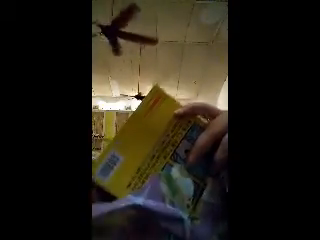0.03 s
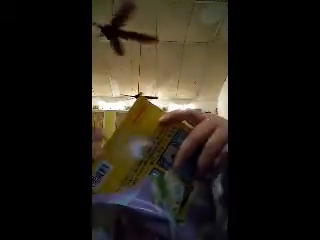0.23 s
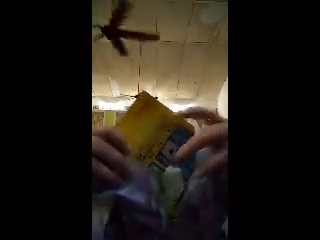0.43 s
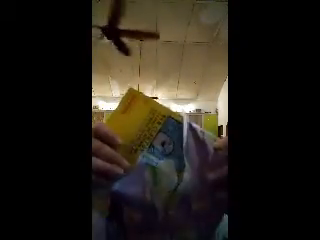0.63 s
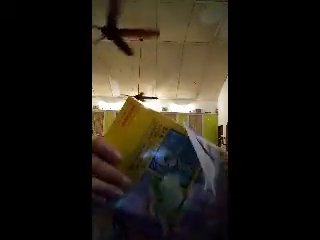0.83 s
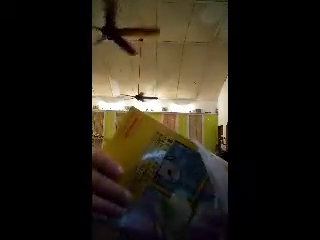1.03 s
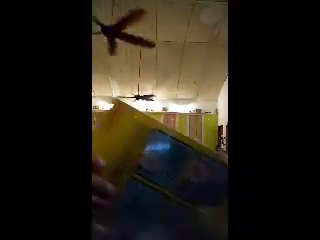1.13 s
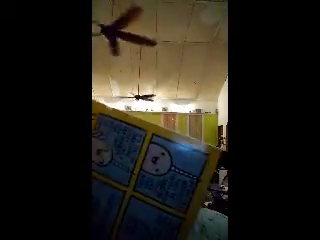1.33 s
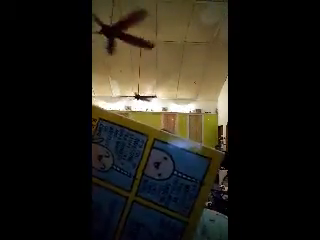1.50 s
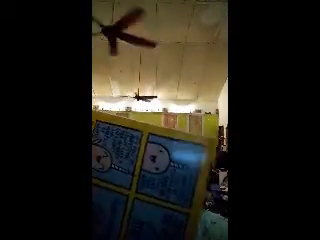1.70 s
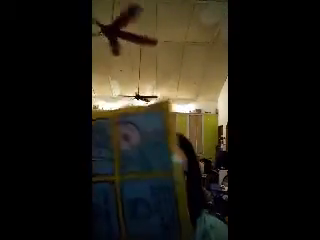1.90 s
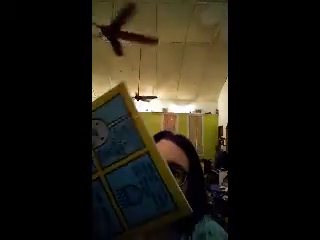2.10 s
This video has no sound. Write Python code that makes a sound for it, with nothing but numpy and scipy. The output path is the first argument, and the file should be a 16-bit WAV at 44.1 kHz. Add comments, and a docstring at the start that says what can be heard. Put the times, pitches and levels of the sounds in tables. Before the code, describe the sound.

Wrapping paper crackles in sharp, uneven bursts close to the microphone, then slides off a flat box with a brief rising swish, followed by more dense crinkling in a quiet room with a short tail.

```python
"""Creases snap singly, each with its own pitch, as wrapping paper is pulled off a flat boxed gift in a room.
Each snap is a click and a few milliseconds of crackle; a dense rustle of tiny ringing buckles lies under them.
The sheet slides off once as a mostly rising rush of filtered noise; the hollow box hums and rumbles in narrow bands.
Snaps and slide get a short noise tail, and faint room tone runs throughout. The paper's bass is cut;
the microphone adds a low thump that follows the paper's bursts, narrow dips and a falling top."""
import sys
import numpy as np
from scipy import signal
from scipy.fft import rfft, irfft
from scipy.io import wavfile

SR = 44100
rng = np.random.default_rng(int(sys.argv[2]) if len(sys.argv) > 2 else 0)


def wav_record(signal):
    """Record a signal, one row per channel, as 16-bit PCM in the file named by sys.argv[1]."""
    frames = np.transpose(np.atleast_2d(signal))
    bounded = np.clip(frames, -1, 1)
    # unit amplitude maps onto the largest positive 16-bit level
    quanta = np.round(bounded * 32767).astype(np.int16)
    wavfile.write(sys.argv[1], SR, quanta)


N = 94903


def from_db(db):
    """Decibels to gain."""
    return 10 ** (np.asarray(db) / 20)


def rms_one(x):
    """Scale to unit rms."""
    return x / np.sqrt(np.mean(x ** 2) + 1e-20)


def at_hz(points, hz):
    """Read a (Hz, dB) spectrum table on a log-frequency axis."""
    points_hz, points_db = np.transpose(points)
    return np.interp(np.log(hz), np.log(points_hz), points_db)


def butter(x, order, edge_hz, kind="low"):
    """Causal Butterworth filter."""
    return signal.sosfilt(signal.butter(order, edge_hz, kind, fs=SR, output="sos"), x)


def band(x, low_hz, high_hz):
    """Causal band-pass, upper edge held below Nyquist."""
    return butter(x, 2, [low_hz, min(high_hz, .45 * SR)], "band")


def band_q(x, hz, q):
    """Band-pass around a pitch; higher q is narrower."""
    ratio = 1 + .5 / q
    return band(x, hz / ratio, hz * ratio)


def ring(clicks, hz, t60_s):
    """Two-pole resonator: each click sets off a decaying sine."""
    radius = from_db(-60 / (t60_s * SR))
    w = 2 * np.pi * hz / SR
    # the tiny offset avoids denormals
    return signal.lfilter([0, np.sin(w)], [1, -2 * radius * np.cos(w), radius ** 2], clicks + 1e-18)


def drift(rate_hz):
    """Slow random wander of unit rms: noise through a double low-pass pole."""
    pole = np.exp(-2 * np.pi * rate_hz / SR)
    wander = signal.lfilter([1], [1, -2 * pole, pole ** 2], rng.standard_normal(N + SR))
    return rms_one(wander[SR:])  # first second settles the filter


def moving_band(rows, width_hz):
    """Noise in a resonance whose level and centre follow (s, dB, Hz) rows; also returns the gain."""
    s, db, hz = np.transpose(rows)
    t = np.arange(N) / SR
    swing = butter(rng.standard_normal((2, N)), 2, width_hz / 2)
    phase = 2 * np.pi * np.cumsum(np.interp(t, s, hz)) / SR
    gain = from_db(np.interp(t, s, db, -120, -120))
    carried = swing[0] * np.cos(phase) + swing[1] * np.sin(phase)
    return gain * rms_one(carried), gain


def rustle():
    """Tiny buckles come in clumps, each ringing a few cycles at one of 26 pitches over a wide range."""
    # Each row: start in seconds, level 1.5-6 kHz in dB, level below 1.5 kHz in dB, level above 6 kHz in dB.
    level_rows = [(0.0, -39.5, -42.5, -54), (0.032, -40.5, -43, -65.0), (0.067, -56, -52, -79),
                  (0.085, -60.0, -62, -84.0), (0.097, -57, -50.5, -87), (0.117, -62, -57, -92),
                  (0.247, -57, -68.0, -96), (0.267, -45.5, -52, -85), (0.279, -51, -65, -83),
                  (0.297, -34.0, -35.5, -56), (0.317, -52, -51, -72), (0.342, -41, -45.5, -64.0),
                  (0.354, -32.5, -41.5, -51.5), (0.402, -45, -52, -52), (0.419, -38, -53, -52.5),
                  (0.451, -40.5, -41, -48.5), (0.519, -38.5, -47, -52), (0.536, -41.5, -60, -54),
                  (0.554, -34.5, -41.5, -44), (0.596, -50.5, -56.0, -66), (0.624, -46.5, -51.0, -71),
                  (0.646, -39, -46.5, -59), (0.661, -50.5, -59, -72), (0.681, -46.5, -50.0, -57),
                  (0.723, -44, -46.5, -62), (0.746, -35, -41, -49.5), (0.763, -38.5, -43.5, -54),
                  (0.806, -35.0, -37.0, -48), (0.856, -47.0, -46, -62), (0.88, -48.5, -49, -62.0),
                  (0.913, -52.5, -55.5, -81), (1.035, -39.5, -41, -44), (1.165, -37.5, -42.5, -46),
                  (1.185, -41.0, -41, -62.0), (1.245, -50, -54, -69), (1.26, -47.5, -52, -66),
                  (1.277, -53, -60, -78), (1.342, -59, -60.0, -92), (1.357, -50, -54, -84.0),
                  (1.369, -43, -63, -53), (1.394, -61, -55.5, -88), (1.412, -43, -52.5, -68),
                  (1.459, -63.5, -61, -83), (1.479, -44, -46.5, -62.0), (1.512, -54.5, -51.5, -74),
                  (1.527, -39, -48.5, -50), (1.556, -52.5, -62, -71), (1.574, -36.5, -45, -46),
                  (1.594, -40.5, -52, -64), (1.619, -40.5, -45, -47), (1.679, -44.5, -58, -56.5),
                  (1.721, -27, -37, -39.5), (1.768, -44.0, -49.5, -59.5), (1.813, -33.5, -39.5, -40.5),
                  (1.848, -31, -41, -52), (1.863, -40, -42, -53.5), (1.903, -37.5, -41.5, -50),
                  (1.931, -41, -51, -58), (2.025, -46.5, -51, -65), (2.07, -38, -42.5, -55),
                  (2.085, -35.5, -39.0, -42.5), (2.15, -39, -41, -58)]
    # Relative colour within each group. Each row: frequency in Hz, density in dB per Hz.
    colour = [(88, -71), (150, -87.5), (466, -1.5), (689, -1.5), (1310, -1), (1500, 9), (1690, -7.5),
              (3840, -2.5), (9630, -53), (12200, -43), (16000, -53)]
    grains_per_s, grain_spread_db, grain_cycles = 13000, 3.2, 2.8
    clump_db, clump_rate_hz = 1.3, 58

    s, *levels = np.transpose(level_rows)
    t = np.arange(N) / SR
    middle_db, body_db, treble_db = [np.interp(t, s, level) for level in levels]

    clump = from_db(clump_db * drift(clump_rate_hz))
    spread = from_db(grain_spread_db * np.minimum(rng.exponential(1, N), 5))
    sizes = clump * spread * rng.choice([-1, 1], N)
    born = rng.random(N) < grains_per_s / SR
    pitches_hz = np.geomspace(450, 15000, 26)
    dealt = rng.integers(0, len(pitches_hz), N)

    groups = np.zeros((3, N))  # body, middle, treble
    for k, hz in enumerate(pitches_hz):
        clicks = sizes * born * (dealt == k)
        grains = band(ring(clicks, hz, grain_cycles / hz), hz / 1.21, hz * 1.346)
        gain = from_db(at_hz(colour, hz)) * np.sqrt(hz)  # bandwidth grows with pitch
        groups[np.searchsorted([1500, 6000], hz)] += gain * rms_one(grains)
    groups[1] = butter(groups[1], 6, 5800)
    return sum(from_db(db) * rms_one(g) for db, g in zip((body_db, middle_db, treble_db), groups))


def mic_thump(paper):
    """Microphone thump: the paper sound rectified and band-passed low, following its bursts."""
    return from_db(-45) * band(np.abs(paper), 28, 180)


def box_hum():
    """The hollow box hums: narrow-band noise with a wandering centre, fluttering in level."""
    # Each row: start in seconds, level before flutter in dB, resonance in Hz.
    hum_rows = [(0.0, -56, 529), (0.02, -51, 517), (0.24, -64, 490), (0.29, -51, 520), (0.37, -57.5, 481),
                (0.39, -61, 512), (0.42, -44, 543), (0.5, -50, 493), (0.52, -48.5, 492), (0.6, -66, 517),
                (0.63, -66, 489), (0.71, -70, 548), (0.73, -54, 558), (0.84, -52.5, 494), (0.91, -74, 530),
                (1.09, -32.5, 526), (1.12, -59, 530), (1.27, -48.5, 466), (1.32, -52.5, 434),
                (1.38, -63, 478), (1.52, -50.5, 508), (1.54, -63, 494), (1.62, -42.5, 555),
                (1.65, -56, 527.6), (1.71, -35, 512.6), (1.76, -59, 525.7), (1.89, -44.5, 511),
                (1.96, -52, 483), (2.06, -43.5, 562), (2.15, -73, 523)]
    hum, _ = moving_band(hum_rows, width_hz=100)
    flutter_db = 6.5 * (drift(24) - 1.5)
    return hum * from_db(flutter_db)


def handling_rumble():
    """Hands on the box: dull noise, band-passed twice, with a moving level."""
    # Each row: start in seconds, level in dB.
    rumble_rows = [(0.0, -64.5), (0.04, -66), (0.2, -106), (0.36, -63.5), (0.68, -109), (0.73, -85),
                   (0.84, -74.5), (1.0, -89), (1.09, -76.5), (1.16, -61.5), (1.3, -91), (1.5, -62),
                   (1.56, -86), (1.61, -63), (1.67, -78), (1.7, -70), (1.77, -74), (1.83, -60.5),
                   (2.02, -89), (2.15, -69)]
    s, db = np.transpose(rumble_rows)
    low = band(band(rng.standard_normal(N), 192, 510), 192, 510)
    return from_db(np.interp(np.arange(N) / SR, s, db)) * rms_one(low)


def room_tone():
    """Steady faint air noise, coloured in the spectrum."""
    # Relative colour. Each row: frequency in Hz, density in dB per Hz.
    colour = [(30, -50), (200, -61), (350, -12.5), (480, 4), (1000, -20), (3500, -6), (5200, -41),
              (6500, -58), (16000, -16)]
    level_db = -63
    hz = np.maximum(np.arange(N // 2 + 1) * SR / N, 10)
    spectrum = rfft(rng.standard_normal(N)) * from_db(at_hz(colour, hz))
    return from_db(level_db) * rms_one(irfft(spectrum, N))


def snaps():
    """Each crease clicks, then crackles for milliseconds: a pitched middle, a longer body, a treble tick."""
    # Each row: start in seconds, middle peak in dB, middle pitch in Hz, body level in dB re middle,
    # body pitch in Hz, treble level in dB re middle, 60 dB ring-down in seconds.
    crease_rows = [(0.0144, -31, 1470, 2, 1300, -19, 0.013), (0.0271, -13, 3530, -11, 1270, -26, 0.011),
                   (0.0462, -34, 3130, 3, 1400, -30, 0.012), (0.0626, -24, 4060, -7.5, 930, -27, 0.014),
                   (0.0894, -40.5, 3120, -2, 1410, -30, 0.014), (0.1502, -43, 3370, -8, 1440, -31, 0.009),
                   (0.193, -50, 3530, 2.5, 520, -31, 0.0083), (0.2175, -54.5, 2150, 12.5, 990, -29, 0.015),
                   (0.2315, -47, 1510, -9, 1380, -33, 0.009), (0.2589, -30.5, 1750, -0.5, 1350, -33, 0.012),
                   (0.2857, -29.5, 1490, -1, 1300, -20, 0.009),
                   (0.2892, -25.5, 1560, 1.5, 1310, -31, 0.009), (0.2917, -10, 3220, -27, 1360, -27, 0.01),
                   (0.2951, -31, 1530, -14, 1360, -22, 0.009), (0.3114, -35.5, 3880, -3, 523, -31, 0.0076),
                   (0.3247, -24, 3840, -8, 930, -24, 0.011), (0.3419, -23, 2560, -1.5, 1380, -24, 0.009),
                   (0.3454, -28, 1700, -28, 1360, -3, 0.009), (0.3505, -17.5, 2100, -25, 1100, -23, 0.009),
                   (0.3584, -32, 2750, 0.5, 994, -18, 0.012), (0.3678, -28, 3400, -13, 1160, -9, 0.009),
                   (0.3741, -8.5, 4280, -15.5, 1420, -12.5, 0.016),
                   (0.4135, -19.5, 2350, -30, 1180, -24, 0.013), (0.4252, -27, 2670, -1.5, 1400, 1, 0.0066),
                   (0.436, -30.5, 1850, -16, 1310, -15, 0.008),
                   (0.441, -23.5, 3060, -4.5, 1290, -14, 0.009),
                   (0.5007, -27.5, 2800, -1.5, 1440, -14, 0.009),
                   (0.5125, -21.5, 2750, -13.5, 535, -25, 0.009),
                   (0.544, -26.5, 2820, -4.5, 1180, -14, 0.011),
                   (0.5525, -14.5, 4820, -17, 1230, -17.5, 0.0073),
                   (0.5993, -42, 3470, -8, 1490, -22, 0.009), (0.6142, -32, 1650, -6, 1140, -36, 0.0083),
                   (0.6273, -36, 3620, -7, 1180, -25, 0.009), (0.6393, -23, 2800, -3.5, 1370, -9.5, 0.013),
                   (0.6615, -31, 2520, -3, 1230, -26, 0.009), (0.6878, -34.5, 3730, 2.5, 1310, -25, 0.009),
                   (0.6987, -42, 3570, -18, 1230, -20, 0.009), (0.7369, -16.5, 3630, -5.5, 890, -27, 0.012),
                   (0.7495, -25, 2260, -4, 1130, -28, 0.011), (0.7728, -7, 4200, -12, 1370, -5, 0.0056),
                   (0.8, -28.5, 1450, 0, 1390, -18, 0.0098), (0.8097, -27, 3020, -8, 790, -21, 0.0076),
                   (0.823, -33, 1600, 10, 1330, -18, 0.0074), (0.8363, -23, 3300, -10, 890, -18, 0.009),
                   (0.8666, -29.5, 3040, -6, 1180, -26, 0.0075),
                   (0.8743, -10.5, 3660, -14, 1055, -13, 0.009), (0.9431, -42.5, 1530, 11, 970, -18, 0.009),
                   (0.9671, -19, 3150, -7, 1170, -15, 0.016), (0.9886, -34.5, 1500, 7.5, 980, -20, 0.011),
                   (1.0034, -25, 2900, -29, 950, -15, 0.0071), (1.0194, -35, 1450, 4.5, 1140, -11, 0.009),
                   (1.0311, -16, 2740, -5, 1220, -14, 0.016), (1.0731, -16, 2950, -6, 870, -23, 0.021),
                   (1.096, -25, 4090, -17, 1120, -18, 0.009), (1.1665, -24, 3900, 0, 1360, -12, 0.01),
                   (1.221, -23.5, 3900, -7.5, 1020, -20, 0.0078),
                   (1.2494, -20.5, 3000, -20.5, 510, -11, 0.01), (1.2593, -44, 2480, -9, 524, -27, 0.009),
                   (1.3588, -16, 3870, -17, 1040, -11, 0.012), (1.3742, -40, 1850, -13, 1060, -21, 0.009),
                   (1.4031, -27.5, 1500, -8, 1120, -10, 0.016),
                   (1.4673, -22.5, 4630, -10.5, 1080, -9, 0.011), (1.475, -51, 1770, 10, 1010, -5, 0.009),
                   (1.516, -21.5, 3570, -10.5, 1340, -5, 0.012), (1.5217, -27, 3280, -10.5, 865, -4, 0.009),
                   (1.5591, -26.5, 1780, -11, 1490, -8, 0.01), (1.5682, -36, 2080, -7, 810, -11, 0.0097),
                   (1.576, -34.5, 1660, 8.5, 880, -20, 0.0066), (1.6, -38, 2890, -19, 1380, -18, 0.008),
                   (1.6178, -34, 1810, 3, 1490, -16, 0.009), (1.648, -27, 2280, -20, 1490, 7, 0.008),
                   (1.6634, -33, 3040, -11, 1330, -15, 0.013), (1.6799, -25, 2710, -7, 1240, -11, 0.015),
                   (1.6896, -19, 4520, -30, 1230, -3, 0.014), (1.6998, -9, 3000, -8.5, 1300, -17, 0.01),
                   (1.7122, -15, 2600, -30, 1250, -19, 0.014), (1.7161, -12.5, 2940, -30, 860, -15, 0.013),
                   (1.7207, -20, 2760, -12, 544, -23, 0.014), (1.7357, -32, 3320, -18, 1340, -23, 0.009),
                   (1.747, -28, 1890, -6.5, 735, -18, 0.016), (1.7786, -19.5, 4170, -16.5, 544, -13, 0.009),
                   (1.8029, -15, 2830, -20, 1230, -4.5, 0.015), (1.8092, -26, 1890, -27, 1270, -16, 0.0081),
                   (1.8391, -15, 2180, -19, 1480, -22, 0.0051), (1.8469, -32, 1500, -0.5, 1040, -23, 0.009),
                   (1.8712, -27, 1980, -7, 1210, -28, 0.011), (1.876, -27, 1650, -2, 1250, -16, 0.012),
                   (1.895, -10, 3090, -13.5, 1270, -23, 0.015), (1.9092, -34, 4940, -8, 1210, -8, 0.01),
                   (1.9361, -24.5, 4500, -8, 1490, -19, 0.009),
                   (1.9988, -26.5, 4300, -23, 560, -11.5, 0.013),
                   (2.0114, -34.5, 2350, -5.5, 590, -18, 0.009),
                   (2.0252, -33.5, 1710, -6, 1290, -38, 0.014), (2.0322, -25, 2600, -8.5, 1180, -4, 0.011),
                   (2.0502, -31, 1890, 2, 1210, -26, 0.011), (2.0692, -30.5, 1640, -9, 1210, -11, 0.012),
                   (2.0788, -12.5, 5200, -10.5, 1290, -12, 0.008),
                   (2.0944, -34.5, 1510, -3, 1360, -20, 0.011),
                   (2.1231, -32.5, 1510, 10.5, 1220, -17, 0.0099),
                   (2.136, -17, 1840, -6, 1230, -22, 0.0042), (2.1478, -25, 3600, -8, 1290, -20, 0.012)]
    rise_s, click_height = .0003, 11.0  # click height re unit-rms crackle
    middle_q, body_q = 1.71, 1.53
    body_stretch, treble_stretch = 1.38, .98  # ring-down re middle

    out = np.zeros(N + SR)
    t = np.arange(SR // 20) / SR
    noise = rng.standard_normal((len(crease_rows), 3, len(t)))
    # one polarity for all three parts
    noise[:, :, int(rise_s * SR)] = click_height * np.sign(noise[:, :1, 0])

    for row, (middle, body, treble) in zip(crease_rows, noise):
        s, peak_db, hz, body_db, body_hz, treble_db, t60_s = row

        def shape(stretch):
            """Fast rise, exponential ring-down."""
            return (1 - np.exp(-t / rise_s)) * from_db(-60 * t / (max(t60_s, .002) * stretch))

        parts = [band_q(middle * shape(1), hz, middle_q),
                 band_q(body * shape(body_stretch), body_hz, body_q),
                 band(treble * shape(treble_stretch), 3650, 13100)]
        start = int(s * SR)
        for part, rel_db in zip(parts, (0, body_db, treble_db)):
            out[start:start + len(t)] += from_db(peak_db + rel_db) * part / np.abs(part).max()
    return out[:N]


def room_tail(x):
    """Diffuse tail: convolution with dulled, decaying noise after a 3 ms gap."""
    tail_db, t60_s, wall_cut_hz = -24.5, .14, 9500
    t = np.arange(SR // 3) / SR
    tail = band(rng.standard_normal(len(t)), 300, wall_cut_hz)
    tail = tail * from_db(-60 * t / t60_s) * (t > .003)
    return from_db(tail_db) * signal.fftconvolve(x, tail / np.sqrt(np.sum(tail ** 2)))[:N]


def slide():
    """The sheet slides off: friction noise through a mostly rising resonance, with a little air above."""
    # Each row: start in seconds, level in dB, resonance in Hz.
    slide_rows = [(.97, -46, 3300), (1.04, -35.5, 3500), (1.08, -30, 3748), (1.12, -34.5, 4070),
                  (1.165, -32.5, 4400), (1.18, -57, 3880)]
    air_db = -15.5  # re rush
    rush, gain = moving_band(slide_rows, width_hz=1850)
    air = rms_one(band(rng.standard_normal(N), 5500, 11300))
    return rush + from_db(air_db) * gain * air


def scene():
    """Bass-cut paper with its room tail, plus microphone thump, box, rumble and room tone."""
    near = snaps() + slide()
    paper = near + room_tail(near) + rustle()
    thump = mic_thump(paper)
    paper = butter(paper, 4, 321, "high")
    return (paper + thump + box_hum() + handling_rumble() + room_tone())[None]


def record(dry):
    """Microphone: narrow dips of its housing, a falling top, then a steep cut."""
    # Each row: centre in Hz, width in Hz, gain at centre in dB.
    dips = [(650, 90, -7), (1510, 110, -7), (7120, 220, -18), (9500, 220, -12)]
    for hz, width_hz, db in dips:
        peak = signal.lfilter(*signal.iirpeak(hz, hz / width_hz, fs=SR), dry)
        dry = dry - (1 - from_db(db)) * peak
    dry = butter(dry, 2, 10650)
    # order 12, 60 dB stopband from 16.6 kHz
    return signal.sosfilt(signal.cheby2(12, 60, 16600, fs=SR, output="sos"), dry)


dry = scene()
out = record(dry)
wav_record(out)
```